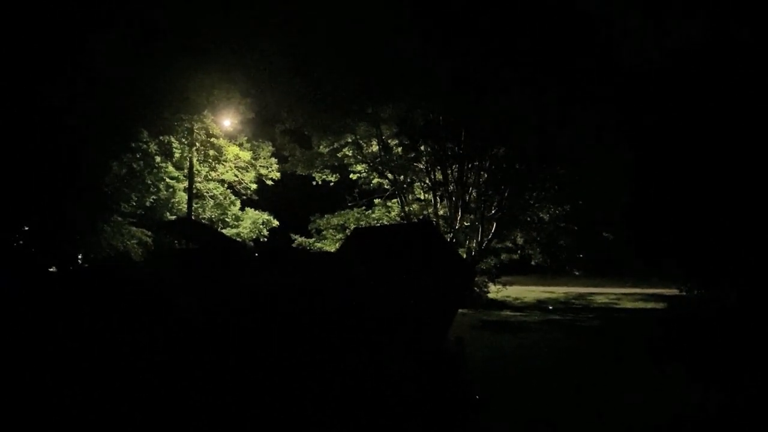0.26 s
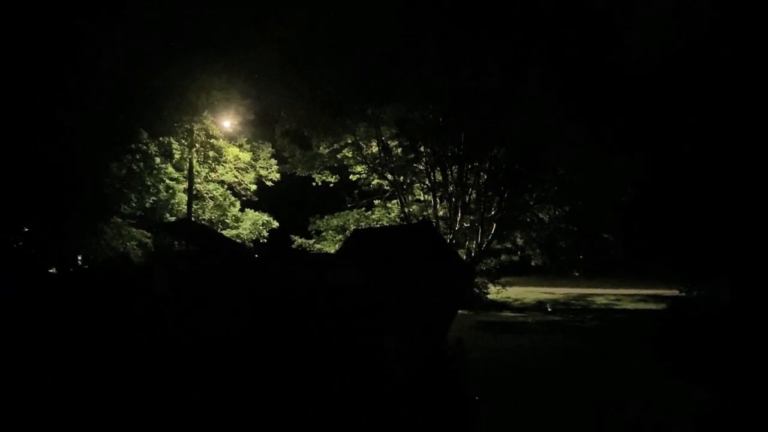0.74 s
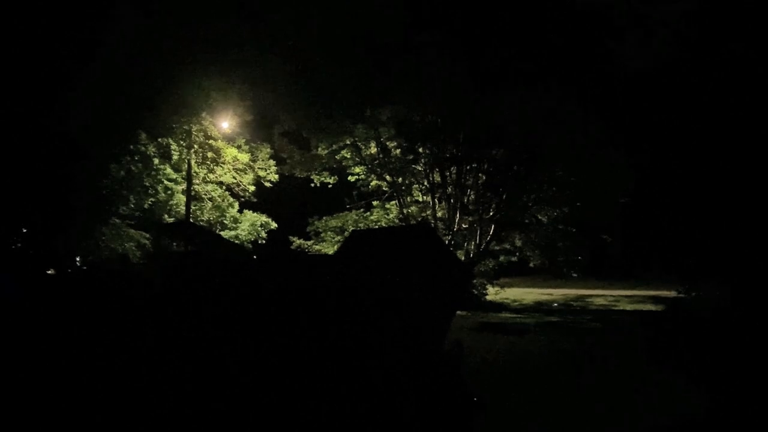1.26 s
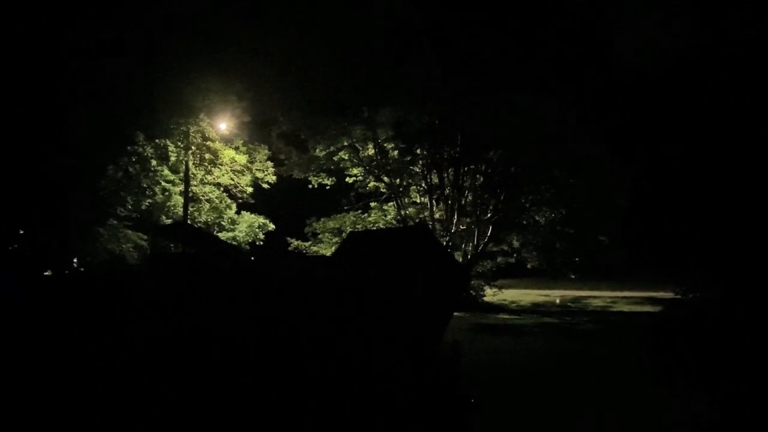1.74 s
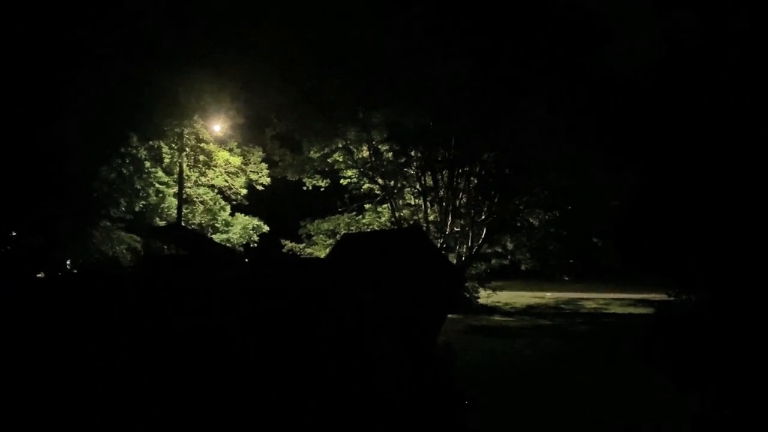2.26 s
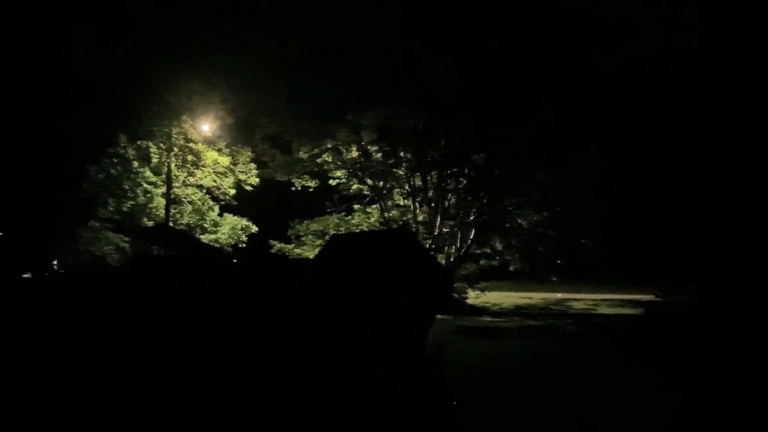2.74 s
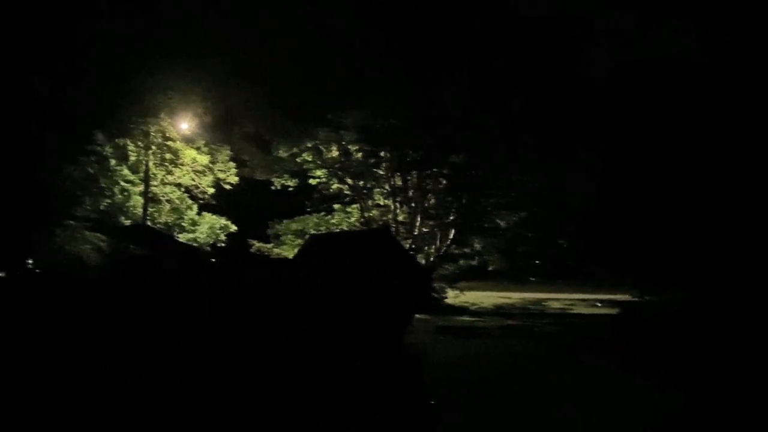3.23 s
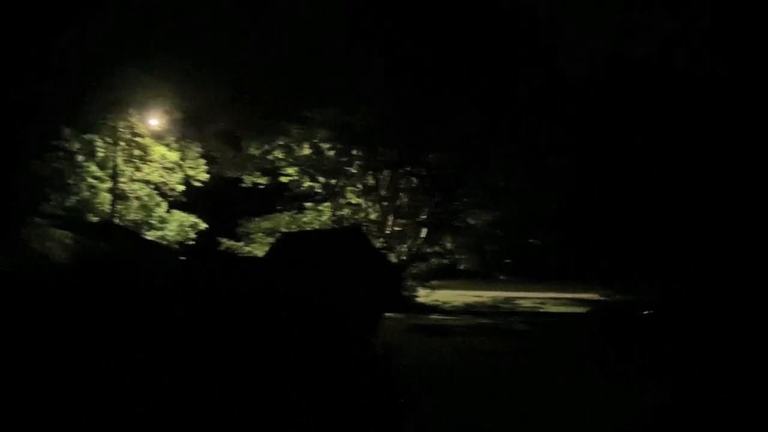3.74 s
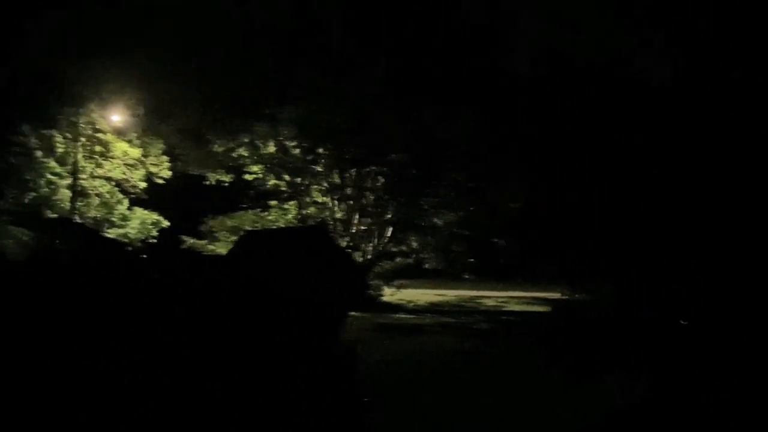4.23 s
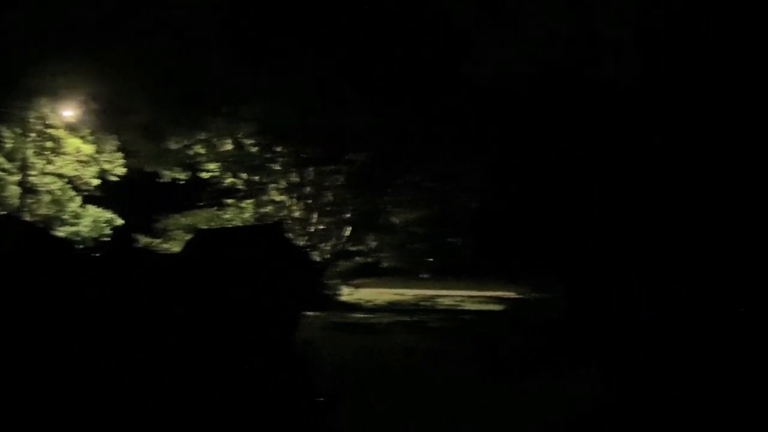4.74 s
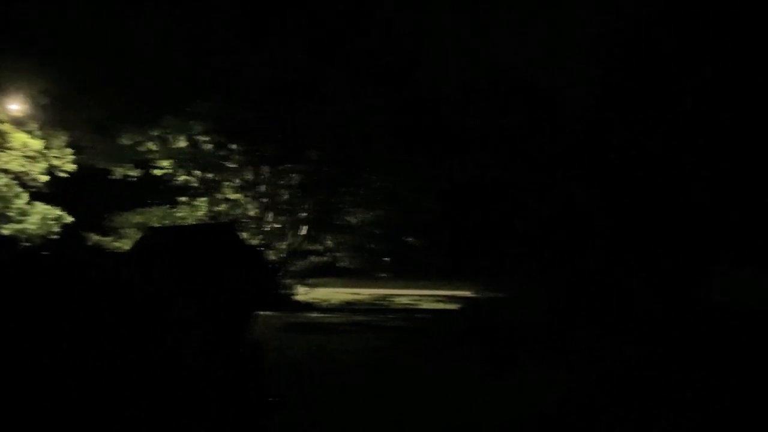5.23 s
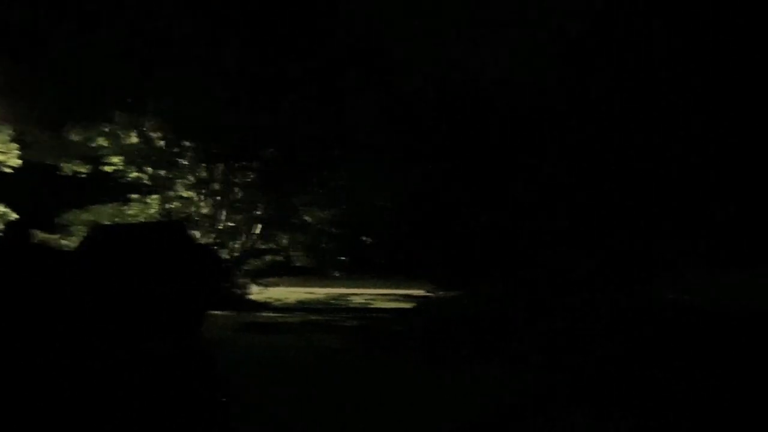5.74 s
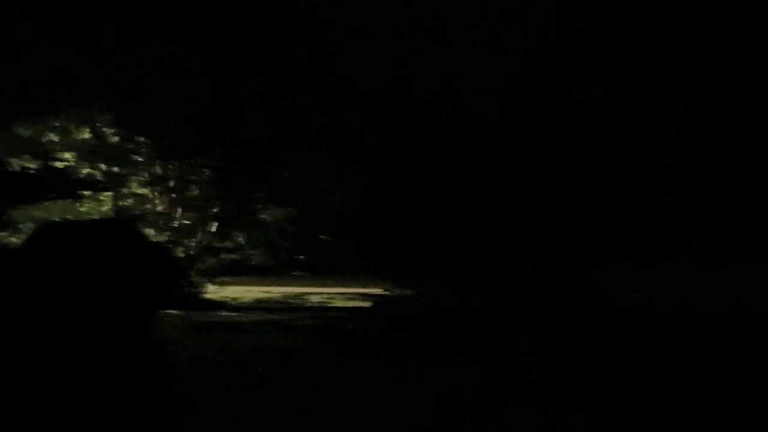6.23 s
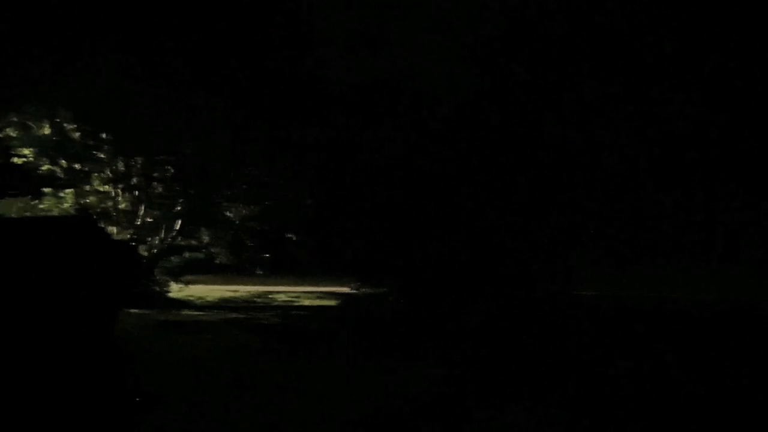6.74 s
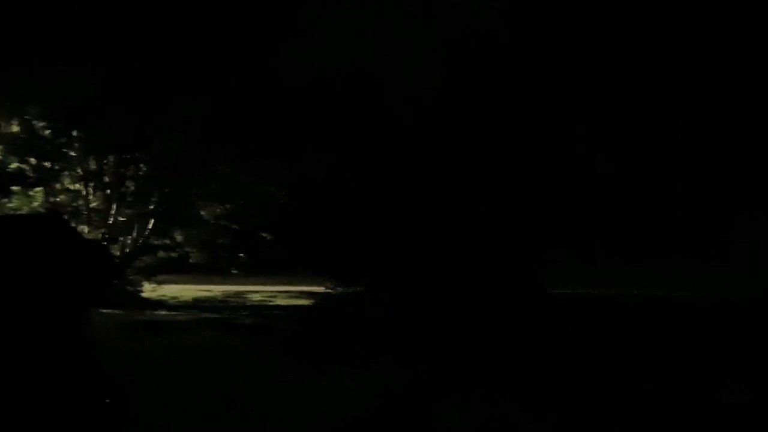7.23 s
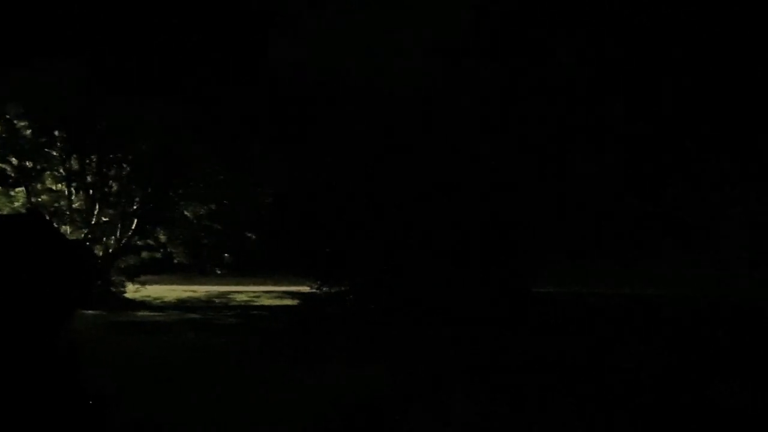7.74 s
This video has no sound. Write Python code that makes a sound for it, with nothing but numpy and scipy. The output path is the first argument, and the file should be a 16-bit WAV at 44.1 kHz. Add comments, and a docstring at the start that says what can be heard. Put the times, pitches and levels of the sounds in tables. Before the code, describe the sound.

A quiet street at night, outdoors. A single mockingbird sings clear from the trees: three quick falling slurs, a pause, five slower double whistles, another pause, four more, then a hurried flourish of chips, a short rasping buzz and a sharp downward sweep. Each note rings softly off leaves and houses. Tree crickets hold a thin high drone; distant traffic rumbles low. Handheld stereo microphone, at some distance.

```python
"""A mockingbird sings from the trees of a quiet street at night: slurs, two runs of paired whistles, then chips and a buzz.
Its voice is gliding sines with faint overtones; the buzz is two such voices pulsing in turn.
Bursts of decaying noise make the leaves scatter each note and the neighbourhood let it ring on.
Tree crickets drone, other insects tick and lisp, and far traffic rumbles, all as coloured noise;
far machines hum as wavering sines."""
import sys
import numpy as np
from scipy import signal
from scipy.fft import rfft, irfft, next_fast_len
from scipy.io import wavfile
from scipy.ndimage import uniform_filter1d

SR = 44100
rng = np.random.default_rng(int(sys.argv[2]) if len(sys.argv) > 2 else 0)


def bounce(signal):
    """Save signal as a 16-bit WAV file at the path given by the first command-line argument."""
    frames = np.transpose(np.atleast_2d(signal))
    limited = np.clip(frames, -1, 1)
    pcm = np.round(limited * 32767).astype(np.int16)
    wavfile.write(sys.argv[1], SR, pcm)


N = 351918
T = np.arange(N) / SR
SIZE = next_fast_len(N + SR)   # transform length, with room for filter tails
HZ = np.arange(SIZE // 2 + 1) * SR / SIZE


def from_db(db):
    """Decibels to amplitude."""
    return 10 ** (np.asarray(db) / 20)


def rms_one(x):
    """Scale to an rms of 1."""
    return x / np.sqrt(np.mean(x ** 2) + 1e-20)


def in_time(rows, t=T):
    """Columns of a curve table, joined by straight lines."""
    s, *columns = np.transpose(rows)
    return [np.interp(t, s, column) for column in columns]


def at_hz(points, hz):
    """A spectrum read on a log-frequency axis."""
    f, value = np.transpose(points)
    return np.interp(np.log(np.maximum(hz, 1)), np.log(f), value)


def drift(rate_hz):
    """Slow random wander of spread about 1: coarse noise through a double one-pole low-pass."""
    steps = T * rate_hz * 20
    r = np.exp(-2 * np.pi / 20)
    noise = rng.standard_normal(2 ** 17)
    slow = signal.lfilter([1], [1, -2 * r, r * r], noise)[100:]   # skip the filter's settling
    return np.interp(steps, np.arange(len(slow)), rms_one(slow))


def delayed(x, seconds):
    """Arrive later, by a fixed or moving time."""
    return np.interp(T - seconds, T, x, left=0, right=0)


def panned(x, db):
    """Raise the left and lower the right by half of db each."""
    return x * from_db(np.array([[1], [-1]]) * db / 2)


def filtered(x, response):
    """Apply a response given at the frequencies HZ."""
    return irfft(rfft(x, SIZE) * response, SIZE)[..., :N]


def to_ears(mid, side, alike):
    """Mix two independent noises into left and right with the correlation alike."""
    return np.sqrt(1 + alike) * mid + np.sqrt(1 - alike) * side * [[1], [-1]]


# correlation between the ears for sound from all around, limited to 0.98 in use: (pitch_hz, correlation)
EAR_LIKENESS = [(60, 0.91), (250, 1), (500, 0.68), (900, 0.67), (2300, 0.1), (4800, 0.28), (8000, 1)]


def diffuse(colour):
    """Stereo noise from all around, falling steeply beyond the ends of its spectrum; rms 1."""
    low_hz, high_hz = colour[0][0], colour[-1][0]
    skirts = np.minimum(HZ / low_hz, 1) ** 4 / np.maximum(HZ / high_hz, 1) ** 8
    mid, side = rfft(rng.standard_normal((2, SIZE)))
    ears = to_ears(mid, side, np.clip(at_hz(EAR_LIKENESS, HZ), 0, .98))
    return rms_one(irfft(ears * skirts * from_db(at_hz(colour, HZ)), SIZE)[:, :N])


def scatter(x, t60, build_s, alike, clump_db=0):
    """Countless small reflections build up and die away, in clumps if from separate trees; unit energy."""
    t = T[:int(1.5 * SR)]
    decay_db = -60 * t / t60 + clump_db * drift(40)[:len(t)]
    shape = from_db(decay_db) * (1 - np.exp(-t / build_s))
    mid, side = rng.standard_normal((2, len(t))) * shape / np.sqrt(2 * np.sum(shape ** 2))
    return signal.fftconvolve(x[None], to_ears(mid, side, alike), axes=1)[:, :N]


# far traffic's low rumble, relative colour: (pitch_hz, level_db per Hz)
RUMBLE_COLOUR = [(22, -32), (30, -21.5), (40, -13), (52, -2), (66, -0.5), (96, -2.5), (118, -3),
                 (168, -12.5), (286, -7.5), (400, -14.5), (560, -21), (620, -22), (810, -41)]
# night air, relative colour: (pitch_hz, level_db per Hz)
AIR_COLOUR = [(450, -46.5), (620, -0.5), (930, 5.5), (1150, -4.5), (1400, -5.5), (1800, -12), (2500, -16.5),
              (3050, -21.5), (3600, -26.5), (6800, -35), (8000, -29), (10000, -36.5), (11500, -36),
              (13000, -60)]
# far machines, each centred on: (pitch_hz, level_db rms)
MACHINE_HUM = [(59.5, -63.5), (143.5, -58.5), (287, -69.5), (430, -80.5)]


def town():
    """Distant traffic rumbles and hisses as coloured noise; far machines hum as unsteady sines."""
    rumble = from_db(-50 + .7 * drift(5)) * diffuse(RUMBLE_COLOUR)
    air = from_db(-59.18) * diffuse(AIR_COLOUR)
    hum = 0
    for hz, db in MACHINE_HUM:
        level = np.sqrt(2) * from_db(db + 1.1 * drift(1.6))
        wavering_hz = hz + 2.218 * drift(5.36)
        hum = hum + level * np.sin(2 * np.pi * np.cumsum(wavering_hz) / SR)
    return rumble + air + hum


# tree crickets' drone, before a 0.5 dB lift and a random wander: (time_s, level_db)
CRICKET_LEVEL = [(0.0, -66.5), (0.31, -67), (0.51, -66.5), (1.44, -67), (5.6, -64.5), (7.34, -65),
                 (7.98, -64)]
# relative colour of the drone: (pitch_hz, level_db per Hz)
CRICKET_COLOUR = [(3600, -30), (4050, -13), (4350, -1), (4650, 5.5), (4870, 6.5), (5200, 3.5), (5420, -13),
                  (5650, -35.5)]


def crickets():
    """Many tree crickets merge into one narrow, wavering drone."""
    level_db, = in_time(CRICKET_LEVEL)
    return from_db(level_db + 0.5 + drift(17)) * diffuse(CRICKET_COLOUR)


# ticking insect, before its strokes and a random wander shape it: (time_s, level_db)
TICKER_LEVEL = [(0, -91), (4, -90), (5.3, -85), (6.2, -79.5), (7, -81), (8, -83)]


def ticker():
    """One insect ticks fast and unevenly: each wing stroke opens two narrow noise bands."""
    level_db, = in_time(TICKER_LEVEL)
    stroke_hz = 22.9 * (1 + .004 * drift(1))
    stroke = (.5 + .5 * np.cos(2 * np.pi * np.cumsum(stroke_hz) / SR)) ** 4
    wing = diffuse([(5750, -35), (6050, 0), (6350, -35)])
    wing = wing + from_db(-4) * diffuse([(2750, -24), (3025, 0), (3250, -24)])
    return from_db(level_db + 1.2 * drift(6)) * stroke * wing


# lisping insect, centre and top of each swell: (peak_s, level_db)
LISP_TIMES = [(1.58, -73.5), (3.85, -74), (4.70, -75), (5.21, -72), (5.56, -73), (5.97, -74), (6.369, -73),
              (7.32, -71), (7.69, -68.5)]


def lisper():
    """Another insect lisps now and then: soft bell-shaped swells of high noise."""
    swells = sum(from_db(db) * np.exp(-((T - s) / 0.035) ** 2) for s, db in LISP_TIMES)
    return swells * diffuse([(6700, -35), (7250, -9), (7600, -3), (8300, -35)])


# how hard the voice is pressed: (time_s, pitch_jitter as a share, overtone_level_db)
VOICE_PRESS = [(.5, 0.0059, -0.5), (2, 0.0037, 0), (3.1, 0.00576, -1), (4.6, 0.0041, 0.5),
               (5.5, 0.0071, 1.5), (7.3, 0.0187, -1), (7.5, .038, 4), (7.65, .035, -2), (7.85, 0.019, 0)]
# overtones against the fundamental, before beak and pressing: (multiple, level_db)
OVERTONE_LEVELS = [(2, -41), (3, -38.5), (4, -33), (5, -32), (6, -35.5), (7, -42)]
# the beak's colour on the overtones: (pitch_hz, level_db)
BEAK_COLOUR = [(4000, -3), (6500, -11), (8000, -9), (9500, 9.5), (11200, -1.5), (12500, -10.5), (13400, -1),
               (14000, 12), (14600, -10), (15200, -21)]


def syrinx(hz, height):
    """A whistle grows unsteady and richer when pressed; gives fundamental and faint overtones apart."""
    jitter, rich_db = in_time(VOICE_PRESS)
    phase = 2 * np.pi * np.cumsum(hz * (1 + jitter * drift(450))) / SR
    overtones = 0
    for multiple, db in OVERTONE_LEVELS:
        level = from_db(db + at_hz(BEAK_COLOUR, multiple * hz))
        audible = multiple * hz < SR / 2
        overtones = overtones + level * audible * np.sin(multiple * phase)
    return height * np.array([np.sin(phase), from_db(rich_db) * overtones])


def swell(t, length, attack, release):
    """Attack, hold and release between 0 and length."""
    return np.clip(np.minimum(t / attack, (length - t) / release), 0, 1)


def glide(share, from_hz, to_hz, bend):
    """Pitch on an exponential approach, over a share of 0 to 1."""
    return from_hz + (to_hz - from_hz) * np.expm1(-bend * share) / np.expm1(-bend)


# a phrase repeats one syllable, its pace drifting evenly and its level settling:
# (start_s, syllable, count, first_period_s, lengthening per repeat, time_stretch, level_db, first_offset_db)
SONG_PHRASES = [ (.023, "slur", 3, .214, -.016, 1.083, -36.3, 2),
                (1.9734, "churee", 5, .2622, .028, .926, -34.3, -3.5),
                (4.533, "churee", 4, .277, .0168, .98, -33.6, -2.2), ]
# the closing flourish of single syllables: (start_s, syllable, time_stretch, level_db)
CLOSING_FLOURISH = [ (7.281, "chip", 1, -33.5), (7.328, "whit", .84, -33), (7.624, "sweep", 1, -28.5),
                    (7.699, "hook", .95, -37), (7.762, "sweep", .58, -51), (7.792, "chip", .9, -30),
                    (7.845, "whit", .92, -32.3), (7.952, "chip", .5, -44), ]
SETTLING = .25   # share of the level offset that is left at each repeat


def song():
    """Every syllable sung, in order: (start_s, syllable, time_stretch, level_db)."""
    for start, name, count, period, lengthening, stretch, db, first_db in SONG_PHRASES:
        for k in range(count):
            slower = (1 + lengthening) ** k
            yield start, name, stretch * slower, db + first_db * SETTLING ** k
            start += period * slower
    yield from CLOSING_FLOURISH


# a syllable is a few glides, timed before the stretch, with levels added to the song's;
# a positive bend moves early and settles, a negative one moves late:
# name: (offset_s, length_s, from_hz, to_hz, bend, attack_s, release_s, level_db)
SYLLABLE_GLIDES = { "slur": [(0, .0306, 2595, 2170, -1.8, .015, .009, 3),
                   (.0246, .0486, 2335, 1935, .3, .006, .006, -1),
                   (.0688, .007, 2470, 2650, .8, .002, .008, -.5)],
                   "churee": [(0, .025, 2155, 2925, 1.2, .014, .012, 2.5),
                   (.0202, .016, 2700, 2255, 3.4, .005, .01, 4.5),
                   (.0246, .0623, 2255, 1995, 3.5, .023, .021, .7),
                   (.089, .015, 2595, 2270, .8, .006, .01, -3.5),
                   (.0993, .051, 2340, 2000, 2.1, .006, .04, -5),
                   (.1503, .0236, 2120, 2895, 2.2, .002, .011, 1)],
                   "chip": [(0, .0315, 3235, 1800, 3, .019, .005, .8)],
                   "whit": [(0, .0167, 1815, 2180, -.9, .004, .002, -4.4),
                   (.0146, .014, 2105, 2795, 3.4, .002, .007, 1),
                   (.029, .005, 2505, 2225, .4, .002, .002, 2.6)],
                   "sweep": [(0, .054, 4130, 2130, 1.7, .027, .026, -.7)],
                   "hook": [(0, .0216, 1650, 3200, -.5, .003, .002, -3.2),
                   (.0177, .024, 1990, 1975, 2, .006, .017, .6)], }


def whistles():
    """One voice sings all the glides, slurring from one to the next where they overlap."""
    weighted_hz, height = np.zeros((2, N))
    for start, name, stretch, db in song():
        for offset, length, from_hz, to_hz, bend, attack, release, glide_db in SYLLABLE_GLIDES[name]:
            edges_s = start + stretch * np.array([offset, offset + length])
            on = slice(*np.searchsorted(T, edges_s))
            t = (T[on] - start) / stretch - offset
            level = from_db(db + glide_db) * swell(t, length, attack, release)
            height[on] += level
            weighted_hz[on] += level * glide(t / length, from_hz, to_hz, bend)
    sung = height > 0
    hz = np.interp(T, T[sung], weighted_hz[sung] / height[sung])
    # about 2 ms of smoothing rounds the joins
    return syrinx(uniform_filter1d(hz, size=90), uniform_filter1d(height, size=90))


# the buzz's low and high voice, before pulsing: (from_hz, to_hz, attack_s, level_db)
BUZZ_PAIR = [(1860, 1970, .015, -37.5), (2420, 2920, .07, -42.5)]
BUZZ_START_S, BUZZ_LENGTH_S, BUZZ_RELEASE_S = 7.427, .14, .04
BUZZ_RATE_HZ, BUZZ_PULSE_S = 71.5, 7.4505   # pulse rate, and the time of one low pulse's peak
BUZZ_SWING = .06   # each pulse of the low voice slides upwards: share of its pitch


def buzz():
    """The two sides of the syrinx pulse in turn, one low and one high, both creeping up in pitch."""
    t = T - BUZZ_START_S
    pitches, heights = [], []
    for from_hz, to_hz, attack, db in BUZZ_PAIR:
        pitches.append(np.interp(t, [0, BUZZ_LENGTH_S], [from_hz, to_hz]))
        heights.append(from_db(db) * swell(t, BUZZ_LENGTH_S, attack, BUZZ_RELEASE_S))
    cycle = 2 * np.pi * BUZZ_RATE_HZ * (T - BUZZ_PULSE_S)
    turn = .5 + .5 * np.cos(cycle)   # 1 for the low voice, 0 for the high
    low = syrinx(pitches[0] * (1 + BUZZ_SWING * np.sin(cycle)), heights[0] * turn ** 2)
    high = syrinx(pitches[1], heights[1] * (1 - turn))
    return (low + high) * (1 + 0.21 * drift(550))   # rough pulses spread into a rasp


# the bird's bearing shifts as the microphone turns: (time_s, left_lead_ms, left_minus_right_db)
BIRD_BEARING = [(0, -0.069, 2.5), (2.5, -0.062, 0.5), (3.2, -0.042, 1), (4.6, 0.042, 5), (5.5, 0.081, 2.5),
                (7.3, 0.11, 2.5), (8, 0.12, 2)]
# colour of what lingers between trees and houses: (pitch_hz, level_db)
LINGER_COLOUR = [(1800, -8), (2200, 12), (2500, 0), (2850, 2), (4000, -3)]
GROUND_S, GROUND_DB = 0.002446, -3.5   # the bounce off the street: delay and level
WALL_S, WALL_DB = .125, -23   # echo from houses across the street: delay, and level before the colour


def bird():
    """The whistle comes direct and by street, leaves and walls; short overtone waves are all scattered."""
    tone, overtones = whistles() + buzz()
    direct = tone + from_db(GROUND_DB) * delayed(tone, GROUND_S)
    leaves = from_db(-10) * scatter(tone, t60=.17, build_s=.003, alike=.7)
    walls = from_db(WALL_DB) * scatter(delayed(tone, WALL_S), t60=.09, build_s=0.0023, alike=0.2)
    tail = from_db(-15.7) * scatter(tone, t60=1.37, build_s=0.016, alike=0.13, clump_db=3.0)
    lingering = filtered(walls + tail, from_db(at_hz(LINGER_COLOUR, HZ)))
    left, right = direct + leaves + lingering
    lead_ms, pan_db = in_time(BIRD_BEARING)
    right = delayed(right, lead_ms / 1000)
    sheen = from_db(3.0) * scatter(overtones, t60=0.17, build_s=0.00033, alike=1.0)
    return panned(np.array([left, right]), pan_db) + sheen


def scene():
    """Town and insects beneath, the bird on top."""
    return town() + crickets() + ticker() + lisper() + bird()


# phase between the microphone pair: (pitch_hz, left_lead_radians)
PAIR_PHASE = [(1200, 0), (1700, 1.4), (1860, 1.5), (1980, -3.5), (2150, -3), (2350, -4), (2520, -4),
              (2650, -5.5), (2950, -5), (3500, -3.5), (4900, -6.5), (6500, -9), (8100, -12.5),
              (9800, -15.7), (11600, -19), (12900, -21.5), (14200, -23.5)]
# level between the microphone pair: (pitch_hz, left_minus_right_db)
PAIR_BALANCE = [(60, 3.5), (250, 1.7), (900, 1.5), (1950, 0), (2600, -3.5), (2850, -4), (3500, -4.5),
                (4800, 2.3), (8000, -0.5)]
CUTOFF_HZ = 15300


def record(dry):
    """The two microphone ports differ in phase and level; a steep low-pass cuts the top."""
    turned = np.exp(.5j * at_hz(PAIR_PHASE, HZ) * [[1], [-1]])
    ports = panned(turned, at_hz(PAIR_BALANCE, HZ))
    low_pass = signal.ellip(10, .1, 80, CUTOFF_HZ, fs=SR, output="sos")
    return signal.sosfilt(low_pass, filtered(dry, ports))


dry = scene()
out = record(dry)
bounce(out)
```